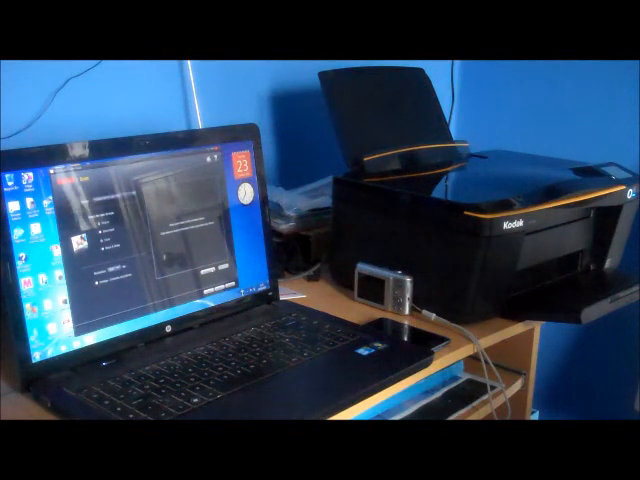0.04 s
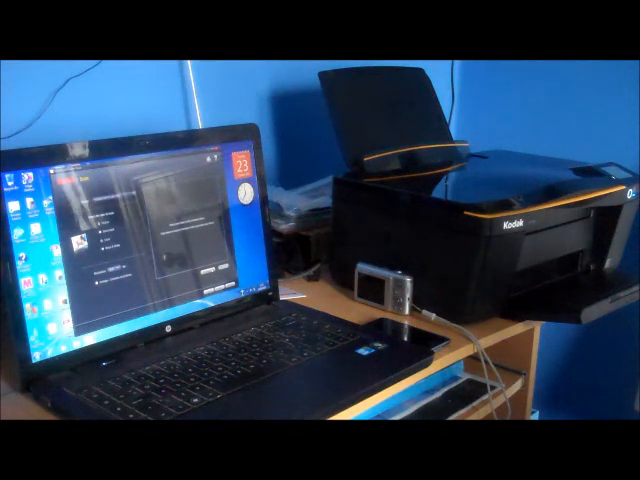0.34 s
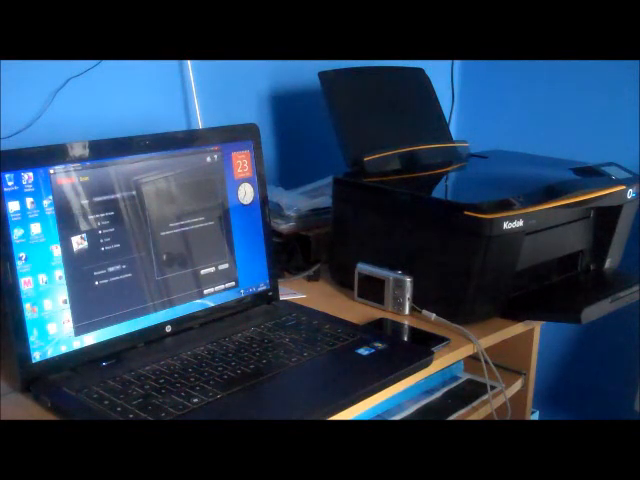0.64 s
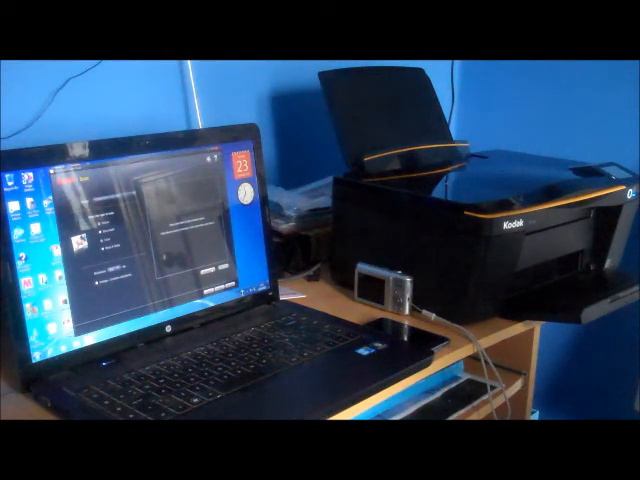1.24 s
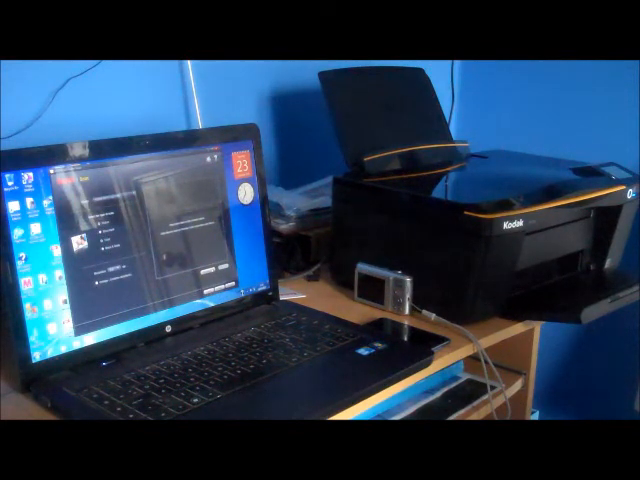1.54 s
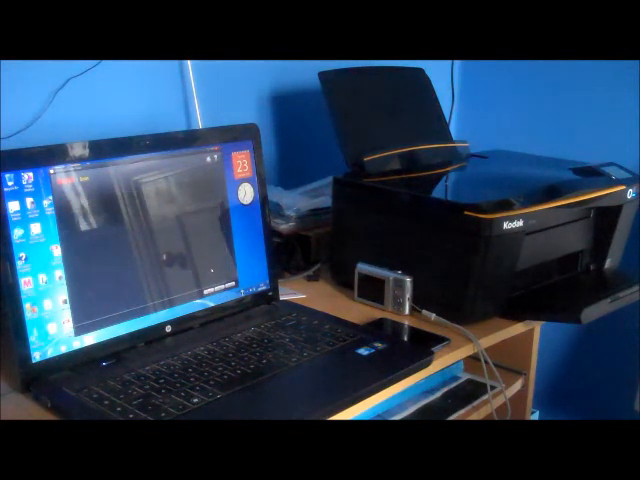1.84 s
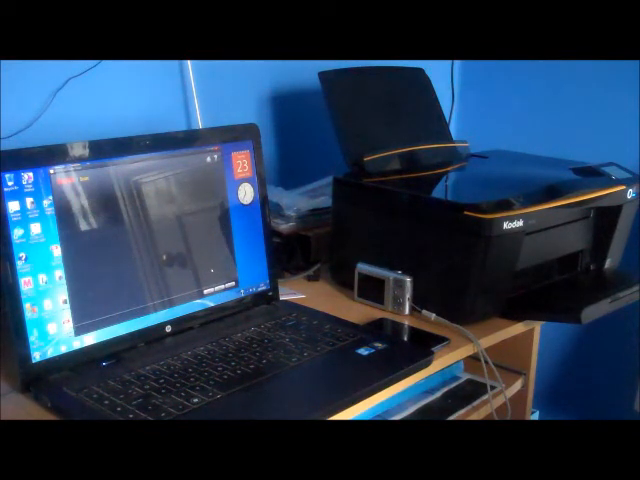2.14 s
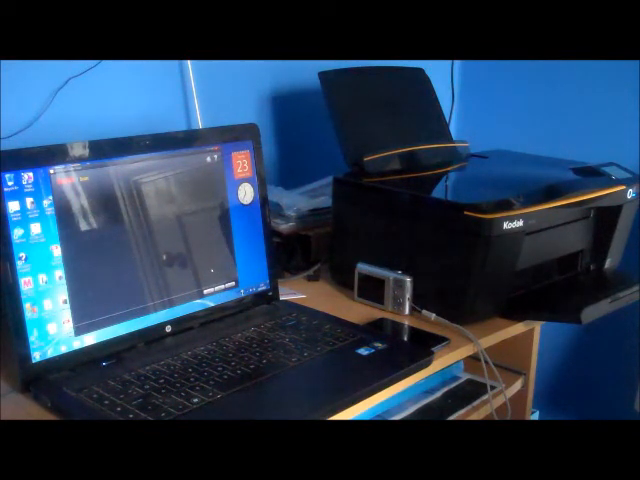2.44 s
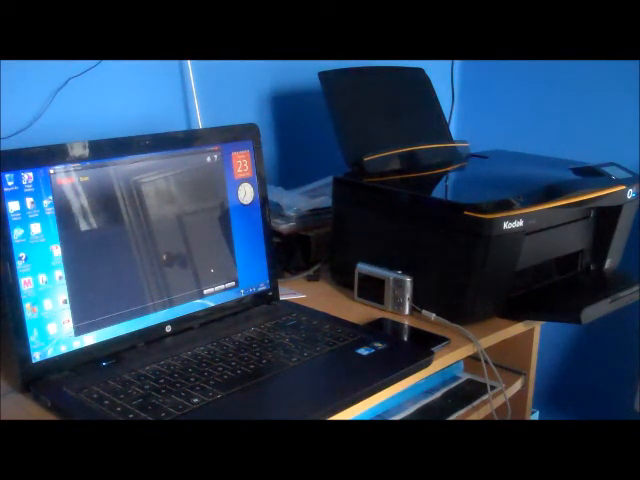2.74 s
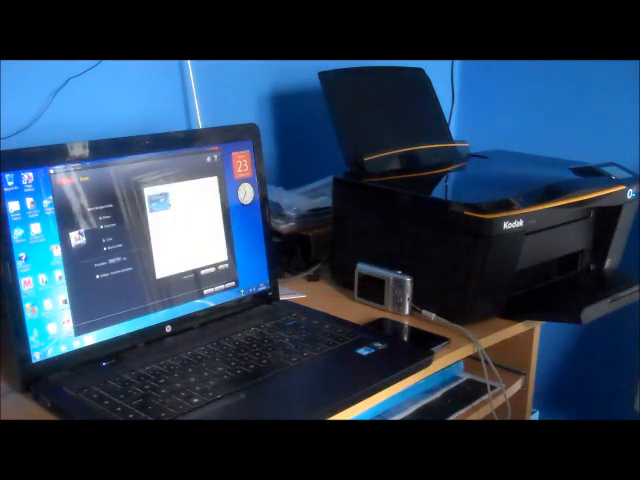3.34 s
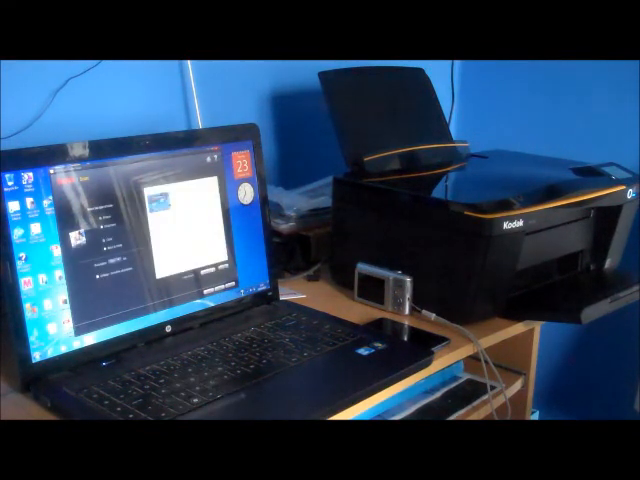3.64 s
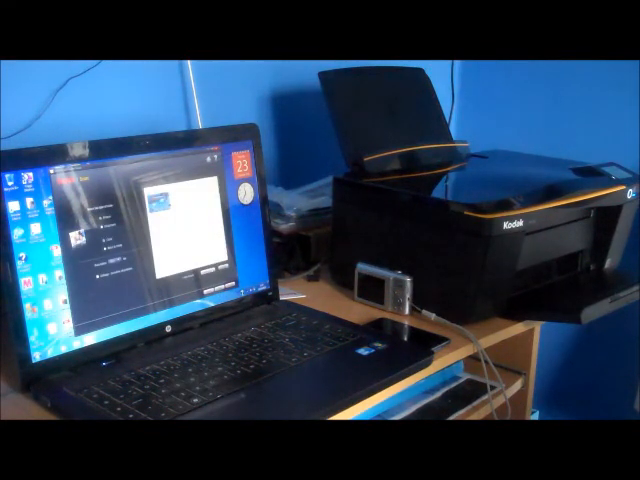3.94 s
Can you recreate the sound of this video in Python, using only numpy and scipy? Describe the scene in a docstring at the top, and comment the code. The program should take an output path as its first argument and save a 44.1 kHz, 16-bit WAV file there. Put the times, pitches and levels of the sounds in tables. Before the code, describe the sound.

A scanner motor whirs and rattles, then stops abruptly, leaving faint room hiss.

```python
"""Flatbed scanner in a small room

Close to a stereo microphone, a stepper motor drives the carriage, then stops dead. Its step rate sets
a stack of whining overtones that swell and fade with the travel; gears rattle, a wheel rubs once a turn.
That leaves room hiss, a thin electronic whine and a small double click to the left, and a soft knock."""
import sys
import numpy as np
from scipy import signal
from scipy.fft import rfft, irfft, next_fast_len
from scipy.io import wavfile
from scipy.ndimage import uniform_filter1d, map_coordinates

SR = 44100
rng = np.random.default_rng(int(sys.argv[2]) if len(sys.argv) > 2 else 0)


def to_wav(s):
    """Save 16-bit WAV."""
    ch = np.atleast_2d(s).T  # columns
    pcm = np.round(np.clip(ch, -1, 1) * 32767)  # PCM
    wavfile.write(sys.argv[1], SR, pcm.astype(np.int16))


N = 176400
TIME = np.arange(N) / SR
STEP_HZ, STEPS_PER_TURN, STOP_S = 105.45, 7, 2.369

def amp(db):
    return 10 ** (np.asarray(db) / 20)

def along(points, hz):
    """Read (Hz, value) points on a log axis."""
    f, v = np.transpose(points)
    return np.interp(np.log(hz + 1), np.log(f + 1), v)

def curve(rows):
    """Join (s, value) points, one value a sample."""
    return np.interp(TIME, *np.transpose(rows))

def wobble(rate):
    """A smooth random curve, rate knots a second."""
    s = np.linspace(0, N / SR, 800)
    return curve(np.c_[s, map_coordinates(rng.standard_normal(size=512), [s * rate], mode="wrap")])

def filtered(x, response):
    m = next_fast_len(N + SR // 2)
    return irfft(rfft(x, m) * response(np.fft.rfftfreq(m, 1 / SR)), m)[..., :N]

def pan(db):
    """Constant-power gains, left over right by db."""
    gains = amp(np.array([db, -db]) / 2)
    return gains / np.sqrt(np.mean(gains ** 2, axis=0))

def placed(pair, spectrum, alike, balance):
    """Give two white noises a spectrum, correlation and balance."""
    angle = lambda hz: np.arccos(along(alike, hz)) / 2
    mid, side = filtered(pair, lambda hz: amp(along(spectrum, hz)) * [np.cos(angle(hz)), np.sin(angle(hz))])
    stereo = np.array([mid + side, mid - side])
    return np.sqrt(SR / 2) * filtered(stereo, lambda hz: pan(along(balance, hz)))

# The small room. Each row: frequency in Hz, seconds to fall 60 dB.
ROOM_DECAY = [(500, 0.38), (2000, 0.21), (8000, 0.25)]
def running(hz, t):
    """Full level until the motor stops; then the room dies away."""
    return np.exp(-np.log(1000) * np.maximum(t - STOP_S, 0) / along(ROOM_DECAY, hz))

# Resonating overtones, by multiple of the step rate. Each row: time in seconds, level in dB before lift.
MOTOR_SWELLS = {3: [(0.03, -58), (0.29, -48), (0.51, -56), (0.59, -48.5), (0.81, -55), (1.01, -52),
                (1.31, -56.5)], 6: [(0.03, -60), (0.95, -65), (1.17, -58), (1.71, -60), (2.15, -58),
                (2.36, -51.5)], 10: [(0.37, -55), (0.65, -64), (1.31, -57), (1.67, -66), (1.75, -59),
                (2.3, -51.5)], 12: [(0.03, -54), (0.43, -61), (0.61, -57), (0.97, -65), (1.41, -52),
                (1.89, -48), (2.27, -66), (2.35, -58)], 18: [(0.03, -56), (0.27, -62), (0.75, -49),
                (1.05, -64), (2.05, -55), (2.35, -61)], 19: [(0.03, -57), (0.17, -66), (0.33, -53),
                (1.21, -54), (1.69, -50), (1.83, -58), (2.01, -49.5)], 20: [(0.03, -62), (0.37, -54),
                (0.49, -56), (0.79, -48.5), (1.17, -57), (1.29, -64), (1.58, -49), (1.99, -46.5),
                (2.35, -49)], 28: [(0.03, -63), (0.51, -57), (0.87, -52), (1.17, -53), (1.3, -62)]}
# Steadier overtones. Each entry: multiple of the step rate, base level in dB.
MOTOR_WHINES = {1: -75.5, 9: -62, 14: -62, 15: -61, 16: -62, 22: -63, 25: -63, 27: -63, 39: -61, 40: -61,
                41: -63, 56: -62, 59: -58.5, 66: -56, 68: -56.5, 69: -58, 74: -56, 76: -57, 77: -58.5, 81:
                -55.5}
# All other overtones. Each row: frequency in Hz, base level in dB.
MOTOR_BUZZ = [(210, -69), (420, -78), (700, -70), (1200, -65), (2500, -65.5), (3500, -63.5), (5200, -70),
              (6300, -64), (8300, -64), (9200, -73)]
# The scanner at the microphone. Each row: frequency in Hz, left minus right in dB.
SCANNER_BALANCE = [(4200, -0.5), (5700, -3), (6500, -1.5), (7300, 14.5), (9700, 15)]
# Its width. Each row: frequency in Hz, left-right correlation.
SCANNER_ALIKE = [(60, 0.51), (250, 1), (1000, 0.93), (4000, 0.52), (8000, 0.22)]
def stepper(lift_db=0.46, hum_order=3, beat_hz=8.3, beat_db=2.2):
    """Overtones of the step rate wander with the carriage, roughened by each turn of the gear."""
    roughness = [(1300, .18), (2100, .42), (2700, .2)]  # Hz, sideband depth
    slow = TIME[::441]
    speed = 1 + 0.000278 * wobble(5.09)
    phase = 2 * np.pi * STEP_HZ * np.cumsum(speed) / SR
    sidebands = np.exp(1j * np.outer([-3, -2, -1, 1, 2, 3], phase / STEPS_PER_TURN))
    step, wave, out = np.exp(1j * phase), np.ones(N, complex), np.zeros((2, N))
    for k in range(1, 88):
        hz, wave = k * STEP_HZ, wave * step
        if k in MOTOR_SWELLS:
            db, wander = np.interp(slow, *np.transpose(MOTOR_SWELLS[k])) + lift_db, .13
        else:
            db, wander = MOTOR_WHINES.get(k, along(MOTOR_BUZZ, hz)) + carriage_db(hz, slow), .4
        if k == hum_order:
            db = db + beat_db * np.cos(2 * np.pi * beat_hz * slow)
        rough = along(roughness, hz)
        drift = (1 + wander * (wobble(3.5) + 1j * wobble(3.5))) / np.sqrt(1 + 2 * wander ** 2)
        teeth = rng.standard_normal(len(sidebands)) + 1j * rng.standard_normal(len(sidebands))
        flutter = (drift + rough * (teeth / np.linalg.norm(teeth)) @ sidebands) / np.sqrt(1 + rough ** 2)
        tone = np.sqrt(2) * curve(np.c_[slow, amp(db) * running(hz, slow)]) * flutter * wave
        lead = (-1) ** k * np.arccos(along(SCANNER_ALIKE, hz)) / 2
        mic_phases = rng.uniform(0, 2 * np.pi) + np.array([lead, -lead])
        mic_gains = pan(along(SCANNER_BALANCE, hz)) * np.exp(1j * mic_phases)
        out += (mic_gains[:, None] * tone).real
    return out

# Rattle through the plastic case. Each row: frequency in Hz, base density in dB per Hz.
GEAR_RATTLE = [(40, -105), (110, -98), (180, -84), (240, -82), (300, -89.5), (370, -85.5), (700, -86),
               (880, -83), (1150, -75.5), (1400, -83), (1780, -85), (2080, -82.5), (2550, -85.5),
               (2950, -77.5), (3300, -81.5), (4200, -82), (4650, -85.5), (5200, -80.5), (5700, -86),
               (6500, -77.5), (7300, -82), (8600, -83.5), (9400, -93.5), (10800, -112), (14000, -118)]
# Low hum. Each entry: multiple of the gear's turn rate, level in dB.
GEAR_TONES = {12: -69, 16: -65, 19: -67}
def gears(repeat=0.27, pulse_depth=0.094, patchy_db=1.5, shake_db=1.33):
    """Tooth chatter, pulsed by each step and partly alike on every turn, over the gear's hum."""
    turn_hz = STEP_HZ / STEPS_PER_TURN
    pulse = (1 + pulse_depth * np.cos(2 * np.pi * STEP_HZ * TIME)) / np.sqrt(1 + pulse_depth ** 2 / 2)
    comb = lambda hz: np.sqrt(1 - repeat ** 2) / (1 - repeat * np.exp(-2j * np.pi * hz / turn_hz))
    chatter = filtered(pulse * rng.standard_normal((2, N)), comb)
    hz, s, bands = signal.stft(chatter, SR, nperseg=1024)
    hz = hz[:, None]
    patches = uniform_filter1d(rng.standard_normal(bands.shape[1:]), size=4, axis=0)
    patches = uniform_filter1d(patches, size=10, axis=1)
    gain = amp(carriage_db(hz, s) + patchy_db * patches / patches.std()) * running(hz, s)
    chatter = signal.istft(bands * gain, nperseg=1024)[1][:, :N]
    hum = 0
    for k, db in GEAR_TONES.items():
        level = np.sqrt(2) * amp(db + 0.43 * wobble(5)) * running(k * turn_hz, TIME)
        hum += level * np.sin(2 * np.pi * k * turn_hz * TIME + wobble(2.6))
    rattle = placed(chatter, GEAR_RATTLE, SCANNER_ALIKE, SCANNER_BALANCE)
    return rattle * amp(shake_db * wobble(21.31)) + hum

# Case resonances. Each row: centre and half length in seconds, pitch and half width in Hz, gain in dB.
CASE_FLARES = [(0.44, 0.16, 3920, 610, 9), (0.79, 0.1, 2000, 130, -6), (1.03, 0.32, 2935, 60, 12),
               (2.0, 0.077, 2120, 70, 12), (2.288, 0.18, 950, 100, 7)]
def carriage_db(hz, t, wheel_turn_s=0.4, first_rub_s=0.085, rub_hz=4410, rub_db=6.5, throb_depth=.14):
    """Resonances flare or dip as the carriage passes; the drive wheel makes them throb, and rubs."""
    bump = lambda distance, half: np.exp(-(distance / half) ** 2)
    turns = (t - first_rub_s) / wheel_turn_s
    throb = 1 - throb_depth + throb_depth * np.cos(2 * np.pi * 4 * turns)
    flares = sum(db * bump(t - at, half) * bump(hz - centre, width)
                 for at, half, centre, width, db in CASE_FLARES)
    from_rub_s = (turns - np.round(turns)) * wheel_turn_s
    return throb * flares + rub_db * bump(from_rub_s, half=0.032) * bump(hz - rub_hz, half=130)

# The room's air. Each row: frequency in Hz, base density in dB per Hz.
AIR_SPECTRUM = [(28, -95.5), (90, -97), (900, -95.5), (2000, -99), (4500, -103), (7200, -102), (9000, -105)]
# Each row: frequency in Hz, left minus right in dB.
AIR_BALANCE = [(40, -2), (200, 6), (1200, 6), (4000, 2.5)]
# Each row: frequency in Hz, left-right correlation.
AIR_ALIKE = [(500, 0.037), (3000, 0.086)]
# Each row: time in seconds, gain in dB.
AIR_GAIN = [(3.25, 0.5), (3.8, 1.26)]
def room_hiss():
    """Diffuse hiss all round the microphone, stronger on the left."""
    return placed(rng.standard_normal((2, N)), AIR_SPECTRUM, AIR_ALIKE, AIR_BALANCE) * amp(curve(AIR_GAIN))

# Electronics to the left. Each row: pitch in Hz, level in dB.
COIL_TONES = [(6999, -76), (8000, -82.5)]
# Each row: start and end in seconds.
COIL_TIMES = [(2.75, 3.03), (3.35, 4.1)]
def coil_whine():
    """Thin, flickering tones that come and go."""
    gate = uniform_filter1d(sum(1. * ((TIME > a) & (TIME < b)) for a, b in COIL_TIMES), size=3500)
    whine = sum(amp(db + 2.7 * wobble(17)) * np.sin(2 * np.pi * hz * TIME) for hz, db in COIL_TONES)
    return np.sqrt(2) * pan(db=7)[:, None] * gate * whine

# Double click, left of the microphone. Each row: start in seconds, burst level in dB, centre in Hz.
CLICK_HITS = [(3.6563, -37, 8700), (3.6615, -42, 12800)]
# Soft knock, near the middle. Each row: start in seconds, burst level in dB, centre in Hz.
KNOCK_HITS = [(3.713, -61, 500), (3.72, -56.5, 6050), (3.721, -59.5, 1790)]
def taps(rows, t60, q, tail_db, tail_t60, pan_db):
    """Short contacts: a burst in one broad resonance, and the room's answer."""
    out = np.zeros((2, N))
    for start, db, hz in rows:
        t = TIME - start
        fade = lambda life: (t >= 0) * np.exp(-np.log(1000) * np.abs(t) / life)
        burst = fade(t60) * rng.standard_normal(N)
        tail = amp(tail_db) * fade(tail_t60) * rng.standard_normal((2, N))
        ring = lambda f: (1j * f * hz / q / (hz * hz - f * f + 1j * f * hz / q)) ** 2
        out += amp(db) * np.sqrt(SR * q / hz / 2) * filtered(burst + tail, ring)
    return pan(pan_db)[:, None] * out

def scene():
    """Motor and gears over the room's hiss, then the whine and the small contacts."""
    click = taps(CLICK_HITS, t60=0.0023, q=0.52, tail_db=-20, tail_t60=0.39, pan_db=7)
    knock = taps(KNOCK_HITS, t60=0.075, q=2.4, tail_db=-7, tail_t60=0.47, pan_db=-1)
    return stepper() + gears() + coil_whine() + room_hiss() + click + knock

def record(dry, top_hz=14250):
    """The microphone passes nothing above its band limit."""
    return filtered(dry, lambda hz: hz < top_hz)

dry = scene()
out = record(dry)
to_wav(out)
```